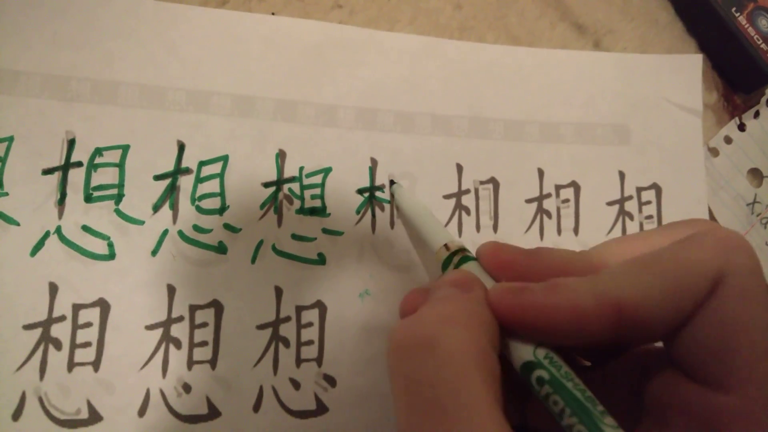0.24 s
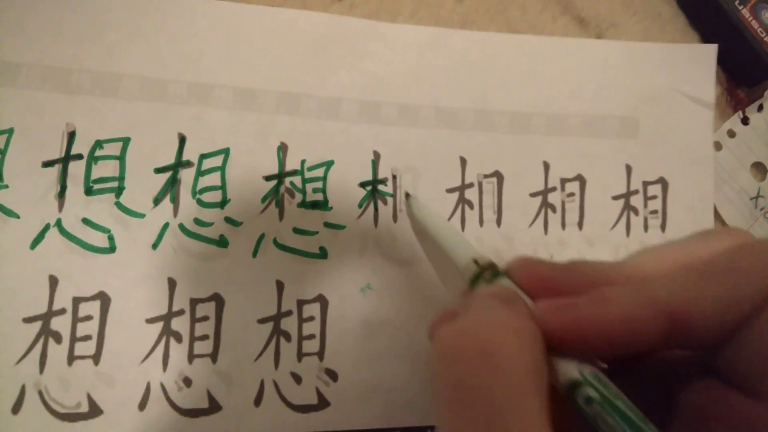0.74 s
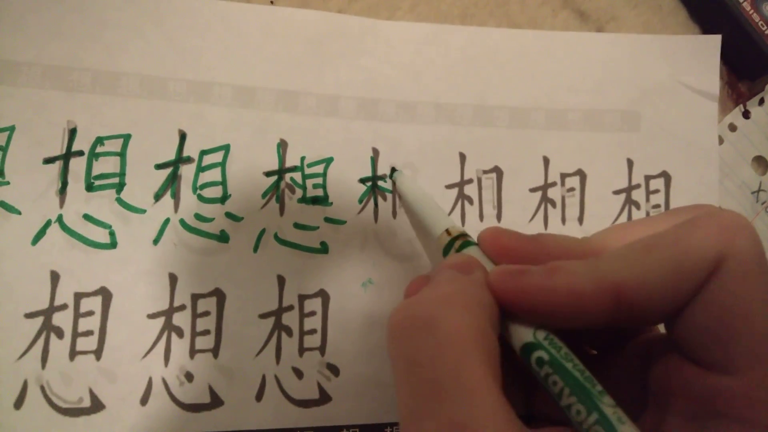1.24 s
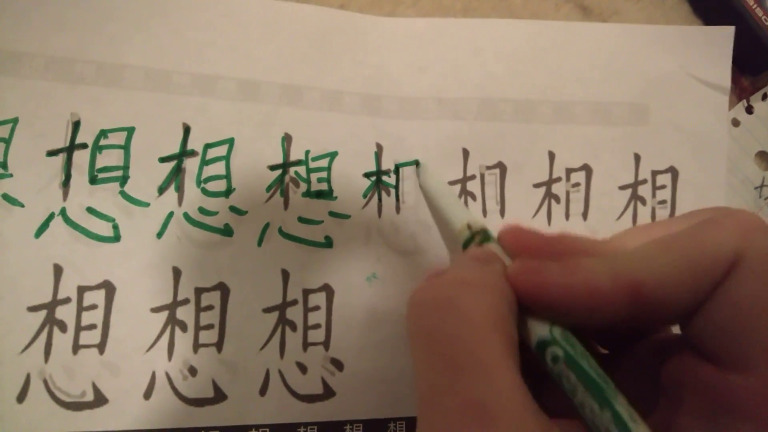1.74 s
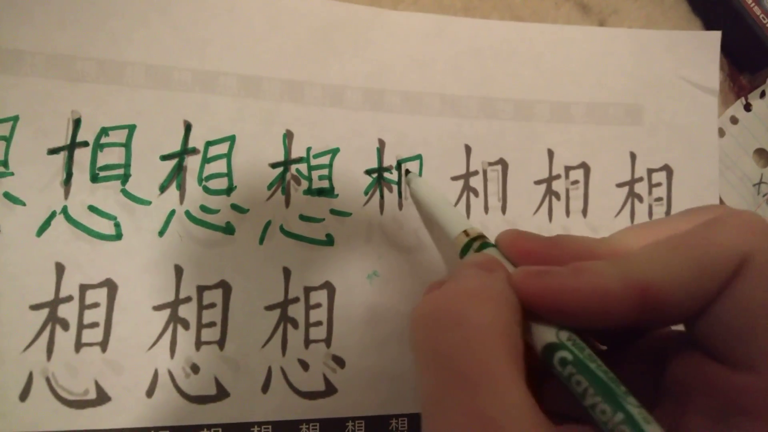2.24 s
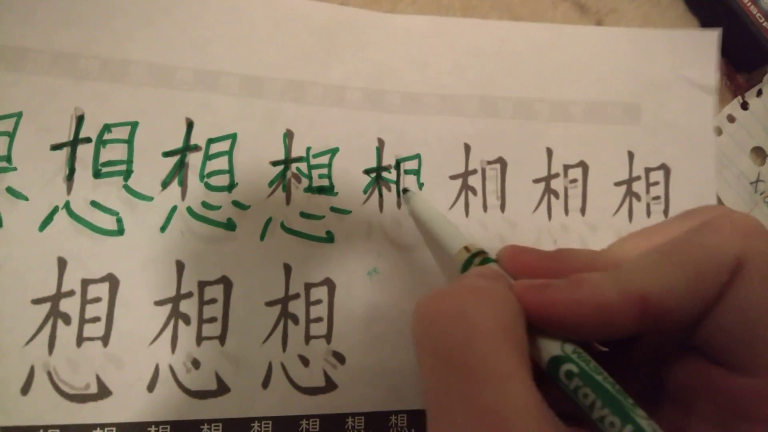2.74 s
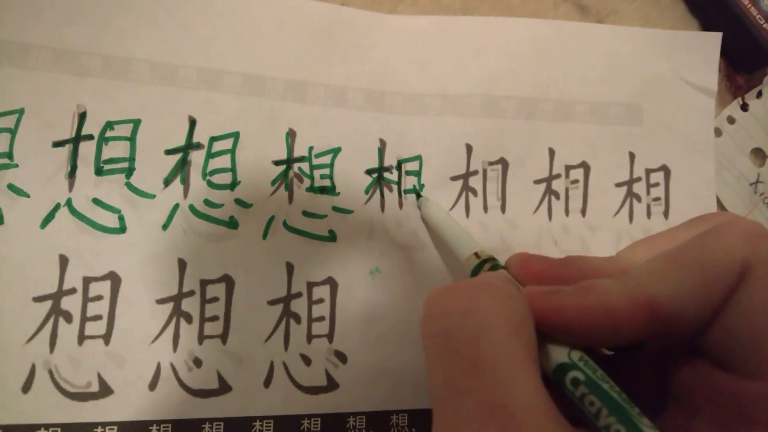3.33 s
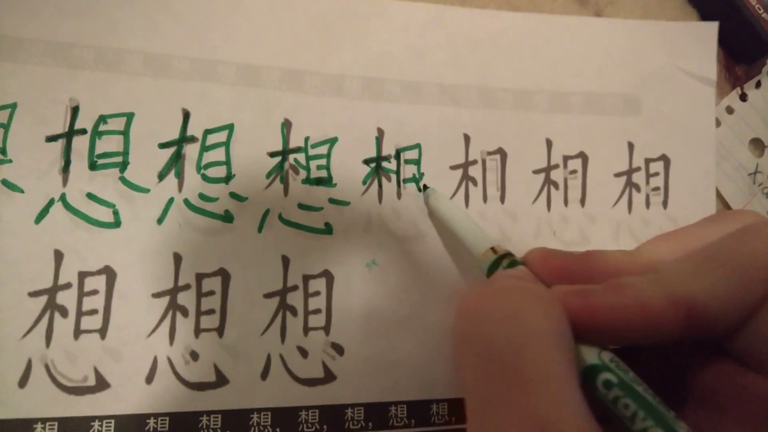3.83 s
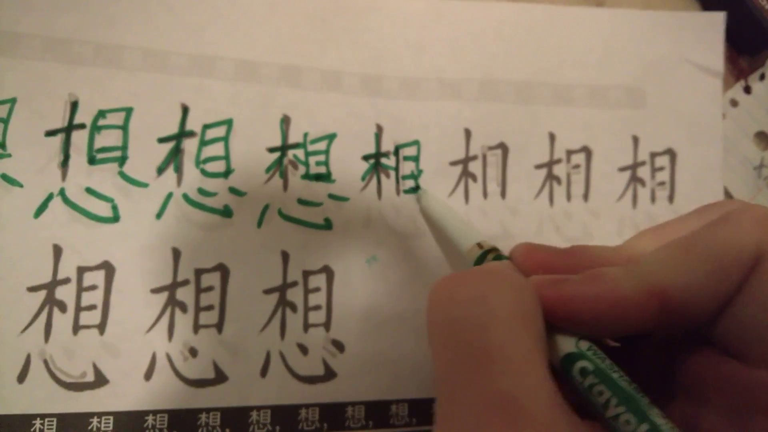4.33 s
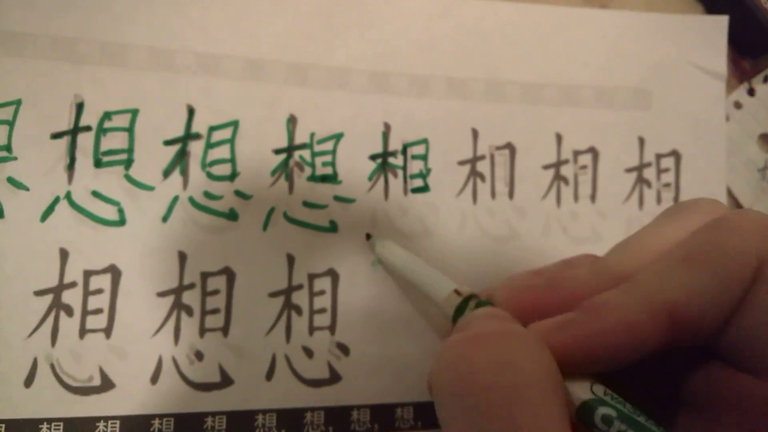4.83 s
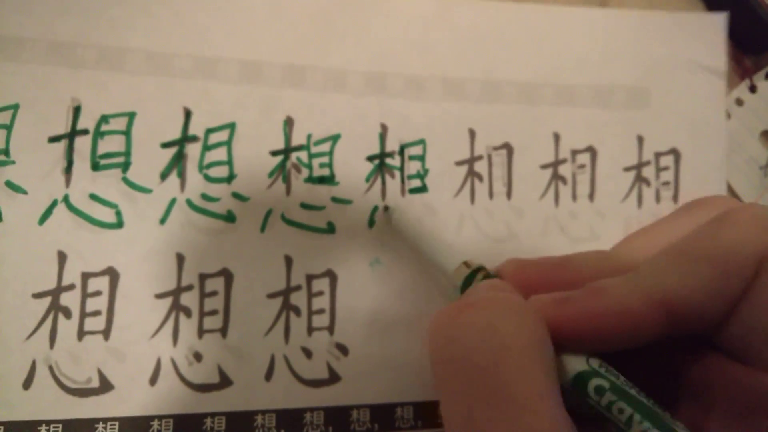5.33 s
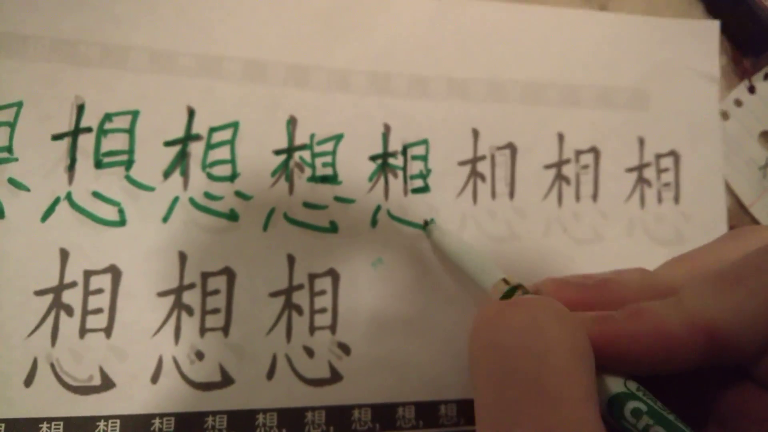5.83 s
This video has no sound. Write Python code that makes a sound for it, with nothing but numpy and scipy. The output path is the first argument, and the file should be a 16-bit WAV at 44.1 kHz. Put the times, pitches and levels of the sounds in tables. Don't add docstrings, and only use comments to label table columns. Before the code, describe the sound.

A quiet, dry room with a faint low hum and soft hiss, heard very close at a desk. For the first second only a hand lightly brushes paper, strongest near 0.6. At 1.06 a small tap, then a short airy felt scratch at 1.3. A hard tap at 1.62 leads into quick firm scrapes until 1.9. Around 2.5 and 2.8 come two gritty little strokes, the second woodier. From 3 to 4 there are mostly faint slides, tiny ticks and a barely audible desk thud at 3.8. Brief scrapes follow at 4.15, 4.25 and 4.43, with a tick at 4.7. After a pause, taps and scratches resume at 5.2, building to a louder scrape and sharp paper crunch at 5.5, then a crisp tick at 5.72. Softer touches and a hand slide close it at about 6. One side is clear, the other dull and hissy.

```python
import sys
import numpy as np
from scipy import signal
from scipy.fft import rfft, irfft
from scipy.io import wavfile
from scipy.ndimage import uniform_filter1d

SR = 44100
rng = np.random.default_rng(int(sys.argv[2]) if len(sys.argv) > 2 else 0)


def log_audio(samples):
    frames = np.atleast_2d(samples).T
    limited = np.clip(frames, -1, 1)
    pcm = np.round(limited * 32767).astype(np.int16)
    wavfile.write(sys.argv[1], SR, pcm)


def boost(x):
    u = np.asarray(x, float) / 20
    return 10 ** u


N = 268286

# [touch-down t/s, length/s, level/dB, desk re sheet/dB, squeal re hiss/dB]
GRIPPING_STROKES = [
    (1.649, 0.052, -39.5, -7.5, 1.5),
    (2.48, .047, -41.5, 2, -4),
    (2.782, .08, -45.5, 7.5, 1.5),
    (4.148, .062, -41.5, 1.5, -1),
    (4.247, .052, -43, 3, -3),
    (4.434, 0.035, -44, -10, -4),
    (5.246, .06, -39, -7, -2.5),
    (5.485, .104, -37.5, -0.5, -5),
]
# [touch-down t/s, length/s, level/dB, desk re sheet/dB, pressure ring re sheet/dB]
GLIDING_STROKES = [(1.147, 0.075, -53, -1, -4), (1.297, .04, -49, -10, -3), (1.326, .076, -35, -11.5, -2.5),
                   (1.7, 0.037, -50, -2, -1), (1.784, .096, -32, -10, -3.5), (1.934, 0.027, -49.5, 0, -1),
                   (3.206, .133, -52.5, 4, -1), (3.366, .051, -57.5, 4, -3), (3.431, 0.053, -59.5, 5, -1),
                   (4.344, .048, -51.5, 5.5, -3.5), (4.565, .049, -45.5, 0.5, -3.5),
                   (5.191, .029, -47, -8, -3.5), (5.342, 0.027, -44.5, -17, -7.5),
                   (5.442, 0.11, -44, -2, -3), (5.56, .095, -46.5, 1, 0.5), (5.704, .02, -38, -5, -6),
                   (5.722, .048, -34.5, 0, 2), (5.655, .045, -52, -16, -12), (2.44, .035, -59, -20, -14),
                   (6.025, .05, -53, -4.5, -1.5)]
# [fastest moment t/s, level/dB, 20 dB rise/s, 20 dB fall/s]
HAND_SLIDES = [(.015, -64, 2, .04), (.12, -65, .06, .5), (.215, -58.5, 0.09, 0.11),
               (.453, -57.5, 0.05, 0.07), (.573, -46, 0.04, 0.13), (.815, -52.5, 0.2, 0.25),
               (0.995, -48, 0.06, 0.06), (1.066, -53.5, 0.07, 0.1), (1.461, -53, 0.28, .19),
               (1.622, -49, 0.07, 0.21), (2.025, -53.5, 0.52, 0.14), (2.156, -56.5, 0.2, .1),
               (2.334, -45, 0.09, 0.04), (2.579, -51, .2, .11), (2.736, -48.5, 0.08, 0.2),
               (2.882, -51, 0.23, 0.12), (3.011, -59.5, .038, .033), (3.176, -50.5, 0.12, .3),
               (3.64, -64, 0.06, 0.2), (3.826, -53, 0.05, 0.22), (4.087, -48, .03, .3),
               (4.526, -50.5, .27, .035), (4.678, -51, .2, 0.16), (4.863, -51.5, .1, 0.05),
               (5.076, -54.5, .135, .16), (5.183, -47.5, 0.06, 0.25), (5.368, -52.5, 0.28, 0.08),
               (5.81, -52, .69, .07), (5.869, -52, 0.12, .06), (6.037, -45.5, 0.11, .14)]
# [f/Hz, level/dB]
DESK_TONE = [(180, -21.5), (260, -10.5), (340, 1.5), (450, -0.5), (560, -2.5), (680, -14), (800, -33.5)]
# [f/Hz, level/dB]
PRESSED_TONE = [(550, -30), (700, -6.5), (890, 0), (1050, 2), (1250, 5.5), (1450, -3), (1900, -37.5)]
# [f/Hz, level/dB]
FREE_SHEET_TONE = [(1000, -34), (1350, -8), (1800, -2), (2050, -2.5), (2350, 1), (2700, -2.5), (3200, -1),
                   (3800, -8.5), (5000, -42)]
# [f/Hz, level/dB]
PINNED_SHEET_TONE = [(1000, -29.5), (1350, -5.5), (1800, 3.5), (2350, -5.5), (2800, -3.5), (3300, -2),
                     (3800, -13), (4400, -23)]
# [f/Hz, level/dB]
FIBRE_TONE = [(3200, -34.5), (3900, -2.5), (4700, -1), (5100, -1.5), (5450, 1), (6000, -3), (7400, -4.5),
              (8600, -5), (10300, -5.5), (11200, -12), (13500, -13), (15600, -16.5), (16000, -27)]
# [f/Hz, width/Hz]
PEN_NOTES = [
    (554, 18.6),
    (10050, 1500),
]
# [t/s, peak level/dB, ring f/Hz, snap level/dB]
TIP_TAPS = [
    (0.106, -53, 2400, -54.5),
    (1.0638, -37, 1600, -54),
    (1.6179, -21.5, 1600, -38),
    (5.2085, -32.5, 1330, -45),
    (5.362, -34.5, 1170, -57),
    (5.863, -36, 2100, -54),
]
# [t/s, peak level/dB, ring f/Hz, snap level/dB]
PAPER_TICKS = [(1.1512, -53, 2220, -51.5), (1.8906, -51, 1830, -51), (1.9389, -41.5, 1350, -40.5),
               (2.9996, -56, 1880, -48), (3.3505, -52, 1980, -47), (3.4334, -50.5, 1780, -47.5),
               (3.6034, -66, 2380, -54), (3.9852, -45, 1700, -41.5), (4.0774, -50.5, 2180, -51),
               (4.4947, -51, 1450, -44), (4.7157, -41, 1900, -45), (4.879, -52, 2020, -56),
               (4.945, -70, 3000, -60), (4.994, -62, 2600, -59), (5.051, -58, 2600, -52),
               (3.377, -70.5, 3000, -58), (3.396, -70, 3000, -57), (3.497, -66, 2390, -53.5),
               (5.442, -35.5, 2010, -63), (5.7054, -35, 1400, -36), (5.7239, -22, 1230, -52),
               (5.9908, -46.5, 2400, -56)]
# [t/s, peak level/dB, ring f/Hz, snap level/dB]
SHEET_CRUNCHES = [
    (5.508, -25.5, 1200, -34),
    (5.5342, -15, 1550, -32),
    (5.9409, -37, 1350, -69),
]
# [f/Hz, level/dB]
SNAP_TONE = [(600, -23), (1500, -2), (5000, 2.5), (10000, -0.5), (15600, -16), (16000, -34)]
# [t/s, peak level/dB, f/Hz, 60 dB fade/s]
DESK_BUMPS = [
    (2.78, -60, 45.5, 0.58),
    (3.32, -58, 61.5, 0.35),
    (3.766, -50, 179, 0.1),
    (3.79, -56, 330, .08),
    (6.03, -56.5, 45, .4),
]
# [f/Hz, level/dB]
PHONE_SHADOW = [(100, -10), (300, -22.5), (700, -27), (1050, -27.5), (1400, -32), (1900, -27),
                (2700, -23.5), (3500, -31), (4300, -25), (6000, -47), (9000, -99), (16000, -62)]
# [f/Hz, level per Hz/dB]
NEAR_NOISE = [(12, -18), (20, -5), (74, -1), (130, 0.5), (187, -4.5), (337, -6), (558, -15), (1030, -20.5),
              (1610, -19), (2200, -16.5), (2390, -10.5), (2910, -31), (5680, -27), (9670, -42),
              (16000, -34)]
# [f/Hz, level per Hz/dB]
FAR_NOISE = [(20, -11), (60, 2), (150, -3), (350, -4), (700, -6), (1200, -15), (2500, -18.5), (4300, -18.5),
             (6000, -23), (8000, -26.5), (13000, -30.5), (16000, -29)]


def level(x, db):
    return x * boost(db) / np.sqrt(np.mean(x ** 2))


def colour(x, points):
    hz, db = np.transpose(points)
    grid = np.maximum(np.arange(1025) * SR / 2048, 1)
    cepstrum = irfft(np.interp(np.log(grid), np.log(hz), db) * np.log(10) / 20)
    cepstrum[1:1024] *= 2
    cepstrum[1025:] = 0
    return signal.fftconvolve(x, irfft(np.exp(rfft(cepstrum))))[:N]


def ring(x, hz, width):
    b, a = signal.iirpeak(hz, hz / width, SR)
    once = signal.lfilter(b, a, x)
    return level(signal.lfilter(b, a, once), 0)


def walk(rate):
    k = int(SR / rate)
    steps = np.repeat(rng.standard_normal(N // k + 1), k)
    return 1.297 * uniform_filter1d(uniform_filter1d(steps, k), k)[:N]


def grains(rate, spread_db):
    slips = rng.random(N) < rate / SR
    return slips * rng.standard_normal(N) * boost(spread_db * rng.exponential(size=N))


def rubbing():
    sheet_db, desk_db, press_db, hiss_db, squeal_db = touch()
    patchy = boost(walk(70))
    slips = level(grains(7000, 0.6) * patchy * boost(1.29 * walk(250)), 0)
    fine = level(grains(20000, 1.8) * boost(2.0 * walk(300)), 0) + 0.5 * slips

    grip = 1 / (1 + boost(-4.0 * (squeal_db - hiss_db + 3.0)))
    barrel, squeak = PEN_NOTES
    swing = ring(slips, *barrel)
    squeal = ring(fine, *squeak)
    swing = ring(np.tanh(3.7 * swing), *barrel)
    hiss = level(colour(fine, FIBRE_TONE), 0) + boost(-0.5) * grip * squeal
    hiss = hiss * (1 + 0.75 * grip * np.tanh(swing)) / np.sqrt(1 + 0.5 * grip ** 2)

    note = 1 / (1 + boost(-3.0 * (squeal_db - hiss_db + 5.5)))
    note = note / (1 + boost(-2.5 * (desk_db + 3)))
    desk = (1 - 0.65 * note) * level(colour(slips, DESK_TONE), 0) + 0.95 * note * swing

    pinned = 1 / (1 + boost(-2.5 * (press_db + 7.5)))
    sheet = pinned * level(colour(slips, PINNED_SHEET_TONE), 0)
    sheet = sheet + (1 - pinned) * level(colour(slips, FREE_SHEET_TONE), 0)
    body = sheet + boost(press_db) * level(colour(slips, PRESSED_TONE), 0)
    return boost(sheet_db + 6.5) * (body + boost(desk_db) * desk + boost(hiss_db) * hiss)


def touch():
    grip_press_db, grip_hiss_db = -3, -1.5
    glide_hiss_db, glide_squeal_db = -5.5, -17
    dome_db, land_s, lift_s = 9, 0.013, 0.026
    desk_swell_db, press_swell_db, hiss_swell_db = 8.5, 6.5, -2.5
    desk_coupling_db, hiss_per_press = -3, -0.6
    hand_db = np.array([-19, -15.5, -1.5, -14])[:, None]
    hand_turn_s, sheet_share_db = 0.006, -5.5

    t = np.arange(0, N / SR + 0.002, 0.001)
    rows = [(*r[:4], grip_press_db, grip_hiss_db, grip_hiss_db + r[4]) for r in GRIPPING_STROKES]
    rows += [(*r, glide_hiss_db, glide_squeal_db) for r in GLIDING_STROKES]
    start, length, db, desk_db, press_db, hiss_db, squeal_db = np.array(rows).T[:, :, None]
    dig = np.clip((t - start) / length, 0, 1) - 0.5
    off = np.maximum(start - t, 0) / land_s + np.maximum(t - start - length, 0) / lift_s
    strokes = boost(2 * (db - dome_db * (2 * dig) ** 2 - 20 * off))
    muffling = hiss_per_press * (press_db - grip_press_db)
    tip_db = np.array([desk_db + desk_coupling_db + desk_swell_db * dig,
                       press_db + press_swell_db * dig,
                       hiss_db + hiss_swell_db * dig + muffling,
                       squeal_db + hiss_swell_db * dig])

    peak, db, rise, fall = np.array(HAND_SLIDES).T[:, :, None]
    away = np.hypot(t - peak, hand_turn_s)
    slides = boost(2 * (db - 20 * away / np.where(t < peak, rise, fall))).sum(axis=0)

    total = strokes.sum(axis=0) + slides
    shares = ((strokes * boost(2 * tip_db)).sum(axis=1) + slides * boost(2 * hand_db)) / total
    powers = (total * boost(2 * sheet_share_db), *shares)
    return [np.interp(np.arange(N) / SR, t, 10 * np.log10(power)) for power in powers]


def ticks():
    size = 2048
    out = np.zeros(N + size)
    t = np.arange(size) / SR
    kinds = ((TIP_TAPS, 0.003), (PAPER_TICKS, 0.011), (SHEET_CRUNCHES, 0.016))
    rows = [(*row, t60) for kind, t60 in kinds for row in kind]
    chances = rng.standard_normal((len(rows), 2, size))
    for (s, db, hz, snap_db, t60), chance in zip(rows, chances):
        knock = chance[0] * boost(-60 * t / max(t60, 0.002))
        turn = 2 * np.pi * hz * t
        patch = np.sin(turn) + np.sin(1.593 * turn) + 0.24 * np.sin(2.31 * turn)
        patch = patch * boost(-60 * t / 0.0039) * np.minimum(t / 0.00049, 1)
        tone = signal.fftconvolve(knock, patch)[:size]
        tone = signal.lfilter(*signal.butter(3, 0.7 * hz, "high", fs=SR), tone)
        snap = colour(chance[1] * boost(-60 * t / 0.0018), SNAP_TONE)[:size]
        i = int(s * SR)
        out[i:i + size] += boost(db + 5.5) * tone / np.abs(tone).max()
        out[i:i + size] += boost(snap_db + 13) * snap / np.abs(snap).max()
    return out[:N]


def bumps():
    start, db, hz, t60 = np.array(DESK_BUMPS).T[:, :, None]
    late = np.maximum(np.arange(N) / SR - start, 0)
    swell = np.minimum(late / 0.0075, 1)
    return np.sum(boost(db - 60 * late / t60) * swell * np.sin(2 * np.pi * hz * late), axis=0)


def room():
    hum_hz, hum_db, lead = 121, -65.5, 40
    shared = rng.standard_normal(N)
    bass = signal.lfilter(*signal.butter(1, 250, fs=SR), shared)
    far = level(colour(0.86 * np.roll(bass, -lead) + rng.standard_normal(N), FAR_NOISE), -70)
    near = level(colour(shared * boost(1.0 * walk(2.9)), NEAR_NOISE), -63.5)
    phase = 2 * np.pi * np.cumsum(hum_hz + 6.0 * walk(12)) / SR
    hum = boost(hum_db + 1.3 * walk(4.94)) * (np.sin(phase) + 0.53 * np.sin(2 * phase))
    return np.array([near + hum, far + boost(-15.5) * np.roll(hum, -lead)])


def scene():
    writing = rubbing() + ticks()
    t = np.arange(4000) / SR
    tails = rng.standard_normal((2, 4000)) * boost(-60 * t / 0.045)
    near = writing + boost(-35.0) * signal.fftconvolve(writing, tails[0])[:N]
    far = writing + boost(-23.0) * signal.fftconvolve(writing, tails[1])[:N]
    far = colour(far, PHONE_SHADOW)
    return np.array([near, far]) + room() + bumps() * boost([[0], [-4.5]])


def top_cut(x):
    return signal.sosfilt(signal.butter(12, 15840, fs=SR, output="sos"), x)


def record(dry):
    return top_cut(dry)


dry = scene()
out = record(dry)
log_audio(out)
```